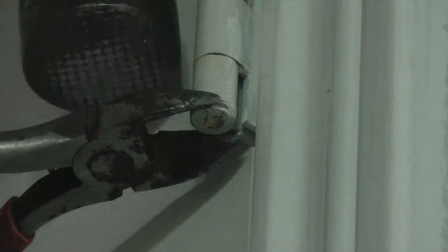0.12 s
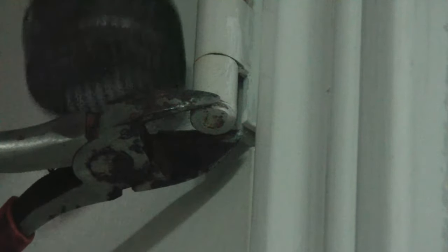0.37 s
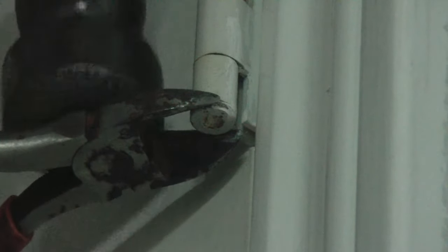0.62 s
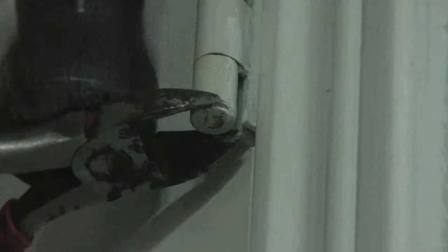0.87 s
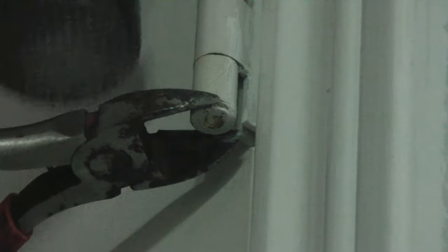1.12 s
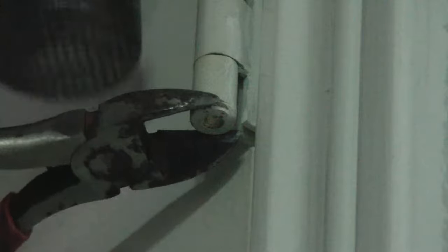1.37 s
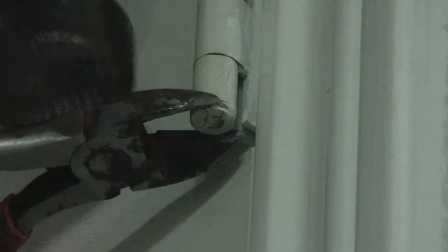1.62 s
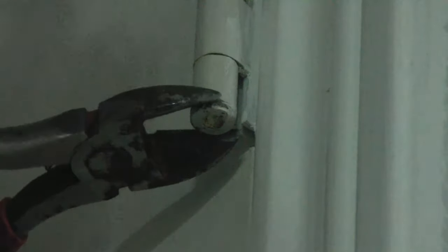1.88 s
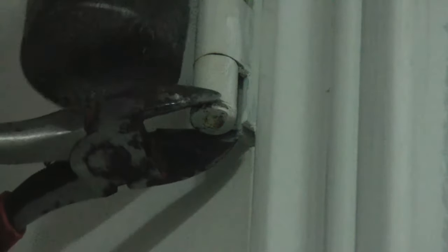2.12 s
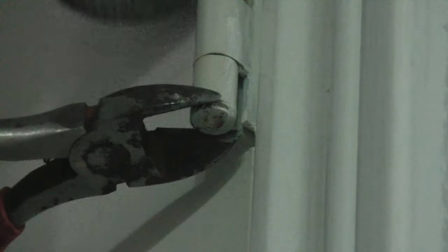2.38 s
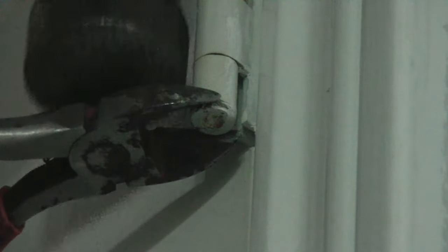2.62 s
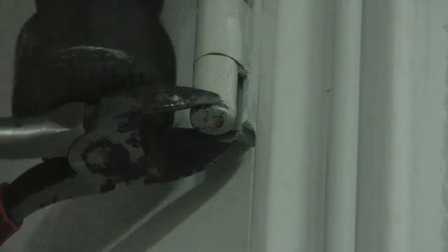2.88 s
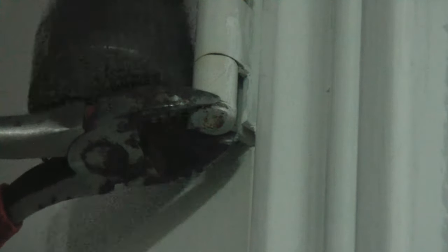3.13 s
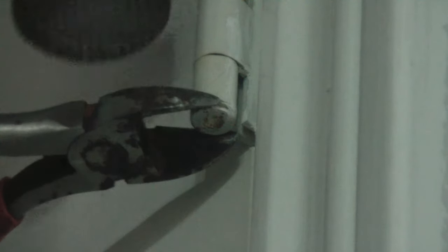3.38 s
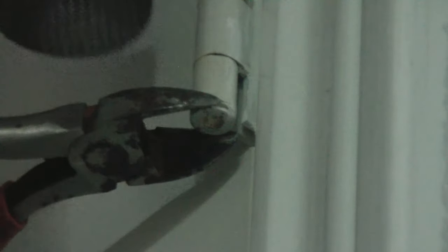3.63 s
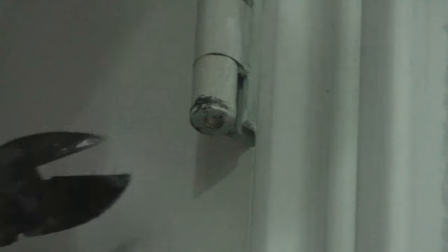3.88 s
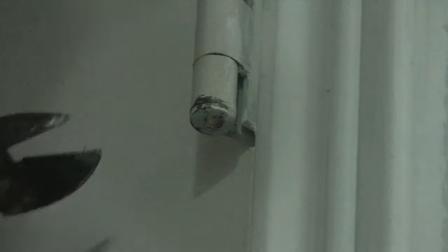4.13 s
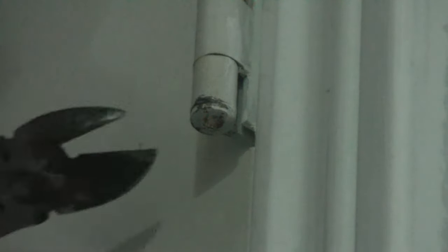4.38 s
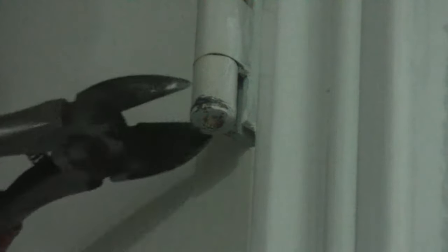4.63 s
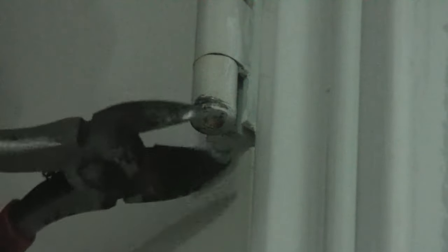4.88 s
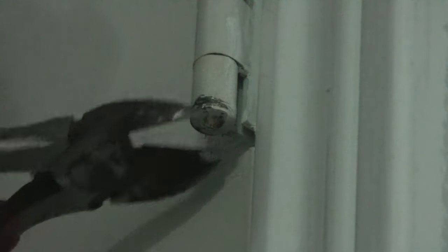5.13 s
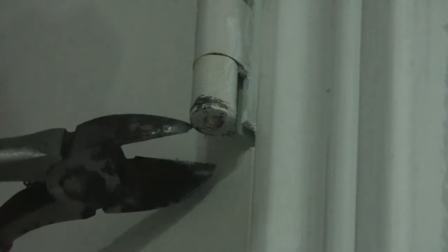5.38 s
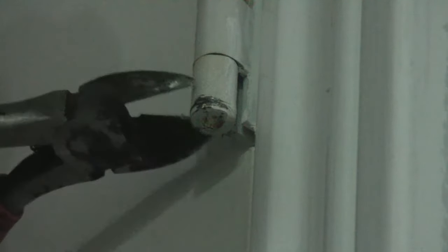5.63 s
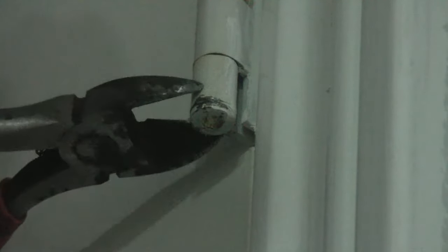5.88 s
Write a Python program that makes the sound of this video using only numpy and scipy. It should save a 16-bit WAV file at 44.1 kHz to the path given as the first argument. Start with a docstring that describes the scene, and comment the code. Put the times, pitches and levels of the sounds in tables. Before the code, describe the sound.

A hammer raps hard on steel pliers gripping a door hinge, loud and close, overloading, then the jaws scrape and nudge the metal cap.

```python
"""Hammer on pliers at a door hinge

A hammer raps steel pliers that grip the cap of a door hinge, close to a small stereo microphone that overloads.
Door, hinge, pin and steel ring as dying sines with a click of contact; a bare room answers with noise tails.
In the quiet the jaws nudge the cap: runs of tiny slips excite the door and jaws. Room tone lies beneath."""
import sys
import numpy as np
from scipy import signal
from scipy.io import wavfile

SR = 44100
rng = np.random.default_rng(int(sys.argv[2]) if len(sys.argv) > 2 else 0)


def wrap_up_sound(samples):
    """Save the sound to the file named by the first command line argument, as 16-bit audio."""
    columns = np.atleast_2d(samples).T
    # keep every value between -1 and 1, then stretch to whole-number steps
    tamed = np.clip(columns, -1, 1)
    steps = np.round(tamed * 32767).astype(np.int16)
    wavfile.write(sys.argv[1], SR, steps)


def how_loud(loudness_db):
    """Turn decibels into a plain amplitude multiplier (0 dB gives 1, 20 dB gives 10)."""
    steps = np.asarray(loudness_db, float) / 20
    return 10 ** steps


N = 264820  # length in samples


def evened(x):
    """Scales to rms 1."""
    return x / np.sqrt(np.mean(x ** 2) + 1e-20)


def read(points, hz, column=1):
    """Reads a table on a log-frequency axis."""
    table = np.transpose(points)
    return np.interp(np.log(hz + 1), np.log(table[0] + 1), table[column])


def stereo_noise(frames, alike):
    """Random short-time spectra for two microphone ports, alike by frequency."""
    a, b, c, d = rng.standard_normal((frames, len(alike), 4)).T
    same = np.clip(alike, -1, 1)[:, None]
    left = a + 1j * b
    right = same * left + np.sqrt(1 - same ** 2) * (c + 1j * d)
    return np.array([left, right])


# colour of the room tone and hiss: (frequency [Hz], relative density [dB])
AIR_COLOUR = [(12, -54), (20, -7.5), (54, -3.5), (174, -13), (242, -7), (270, -12.5), (587, -18),
              (713, -21.5), (940, -16), (1640, -24.5), (2160, -22), (3550, -27.5), (10200, -31),
              (15000, -36.5)]
# left-right likeness of the room tone: (frequency [Hz], correlation [-1 to 1])
AIR_ALIKE = [(60, 0.95), (150, 0.95), (380, 0.91), (950, 0.73), (2380, 0.074), (5980, -0.14), (15000, 0.12)]
# faint steady tones: (frequency [Hz], rms level [dB])
WHINE = [(242.2, -57.5), (963.6, -106.5), (2159, -65), (5125, -71), (7671, -74.5), (9469, -73),
         (10218, -65), (10250, -75)]
AIR_DB = -44  # rms of the hiss over both channels


def air():
    """Room tone and microphone hiss as coloured stereo noise, with a few thin steady sines."""
    hz, t = np.fft.rfftfreq(2048, 1 / SR), np.arange(N) / SR
    spectra = stereo_noise(N // 512 + 5, read(AIR_ALIKE, hz)) * how_loud(read(AIR_COLOUR, hz))[:, None]
    noise = signal.istft(spectra, nperseg=2048, noverlap=1536)[1][:, :N]
    hiss = how_loud(AIR_DB) * evened(noise)
    tones = sum(how_loud(db) * np.sqrt(2) * np.sin(2 * np.pi * (f * t + rng.random())) for f, db in WHINE)
    return hiss + tones


# decay of the room: (frequency [Hz], near t60 [s], far t60 [s])
ROOM_DECAY = [(30, 0.31, 0.79), (153, 0.12, 0.38), (520, 0.23, 0.62), (1930, 0.17, 0.52), (4630, 0.2, 0.5),
              (12200, 0.041, 0.29)]
# left-right likeness of the tail: (frequency [Hz], correlation [0 to 1])
TAIL_ALIKE = [(60, 1), (640, 0.98), (1400, 0.95), (3100, 0.89), (6800, 0.063), (15000, 0.055)]
# stereo balance of the tail: (frequency [Hz], left over right [dB])
TAIL_BALANCE = [(60, 5.5), (240, 0), (950, 0.5), (3770, 1.5), (15000, 3)]
ROOM_DB, FAR_DB = 8, -11  # left tail over the direct sound before the band limit; far start over near start
HEARD_HZ = (111.6, 11300)  # the door radiates little bass; the microphone port dulls the top


def room():
    """Direct sound, a quick noise tail from the near walls and a slower one from the rest of the house."""
    hz, t = np.fft.rfftfreq(256, 1 / SR), np.arange(SR // 88) * 64 / SR
    near_t60 = read(ROOM_DECAY, hz)[:, None]
    far_t60 = read(ROOM_DECAY, hz, column=2)[:, None]
    decay = np.hypot(how_loud(-60 * t / near_t60), how_loud(FAR_DB - 60 * t / far_t60))
    spectra = stereo_noise(len(t), read(TAIL_ALIKE, hz)) * decay
    spectra *= how_loud(np.array([.5, -.5])[:, None, None] * read(TAIL_BALANCE, hz)[:, None])
    tail = signal.istft(spectra, nperseg=256, noverlap=192)[1]
    tail *= np.minimum(np.arange(tail.shape[1]) / (0.001 * SR), 1)  # the walls swell in over 1 ms
    tail *= how_loud(ROOM_DB) / np.linalg.norm(tail[0])
    tail[:, 0] = 1  # direct sound
    return signal.sosfilt(signal.butter(3, HEARD_HZ, "bandpass", fs=SR, output="sos"), tail)


def burst(band_hz, t60):
    """Noise in one band that dies quickly."""
    t = np.arange(SR // 4) / SR
    band = signal.butter(2, band_hz, "bandpass", fs=SR, output="sos")
    return evened(signal.sosfilt(band, rng.standard_normal(len(t)))) * how_loud(-60 * t / t60)


UNEVEN_DB = 1.5  # spread of each mode; no two blows land on the same spot


def ring(modes, spot, knock_db=17):
    """Dying sines of one body plus the click of contact, radiated only in the band of that body."""
    hz, db, t60 = np.transpose(modes)[:, :, None]
    t = np.arange(SR // 4) / SR
    envelopes = how_loud(db + UNEVEN_DB * spot[:len(modes), None] - 60 * t / t60)
    sines = envelopes * np.sin(2 * np.pi * hz * t)
    band = signal.butter(4, (0.92 * hz.min(), 1.108 * hz.max()), "bandpass", fs=SR, output="sos")
    click = signal.sosfilt(band, signal.unit_impulse(len(t)))
    tone = signal.sosfilt(band, sines.sum(0)) / np.linalg.norm(how_loud(db))
    return tone + how_loud(knock_db) * click / np.linalg.norm(click)


# the jaws touch and scrape the cap; the last three levels ride on the force:
# (time [s], force [dB], door knock [dB], jaw clack [dB], jaw ring [dB])
NUDGES = [(1.95, -44, -29, -5, 1), (2.035, -40, -23, -3, -14), (3.642, -55.5, 14.5, 18.5, -34),
          (3.765, -23, -9.5, -5.5, -27), (3.921, -35.5, 2.5, 2, -14), (3.952, -43.5, -11, 7, 5),
          (4.138, -44, -14, -2, -16), (4.731, -23, -8, -7, -14), (4.802, -34, -6, -0.5, -10),
          (5.007, -36, -26, -2, -27), (5.021, -2, -22.5, -8.5, -7), (5.212, -20, -1, 5.5, -44),
          (5.299, -23.5, -0.5, 0, -13.5), (5.364, -25.5, -12.5, -8, -20), (5.465, -38, -28, -15, -11),
          (5.542, -28, -17, -9, -11.5), (5.766, -29, -3, 2, -35), (5.814, -19.5, -8, -15.5, -41)]
# door modes, also rung by the hammer: (frequency [Hz], relative level [dB], t60 before damping [s])
DOOR = [(130.7, -30, 0.099), (155.2, -9, 0.62), (176.5, 1.5, 0.17), (220.3, -2.5, 0.24), (295, -3, 0.036),
        (358.4, -20.5, 0.69), (430.5, -2.5, 0.13), (465.4, 2, 0.025), (649, 15, 0.01), (698, -6.5, 0.37),
        (804, 6.5, 0.017), (1043, 6.5, 0.0081)]
# lower jaw modes: (frequency [Hz], relative level [dB], t60 before damping [s])
JAW_CLACK = [(684, -10, .12), (969, -10, .05), (1050, -13, .04), (1394, -10, .008), (1642, -6, .01),
             (1850, -6, .01), (2137, -8, .01), (2471, -13, .008)]
# upper jaw modes: (frequency [Hz], relative level [dB], t60 before damping [s])
JAW_RING = [(2860, -12, .01), (3620, -3, .01), (4210, -12, .006), (4657, -11, .006), (5227, -12, .006),
            (6500, -12, .004), (8000, -14, .004)]
# click of contact against the modes, one [dB] each: (low door, high door, jaw clack, jaw ring)
JAW_KNOCK_DB = (26, 17, 8.9, 13.2)
BOOM_DB, BOOM_PER_DB = -13, 0.06  # low door modes on the knock: dB, and dB per dB of force
DAMPING = 0.14  # dB of ring time lost per dB of force: lightly pressed jaws hardly ring
DRAG_S, HARD_HZ = 0.00025, 12900  # scrape decay and top of the spectrum for a touch of 0 dB
SLIPS_PER_S = 4600
TICK_DB, TICK_HZ, TICK_T60 = -12, (6540, 12950), .02  # dB on the jaw ring, band, s


def nudges():
    """Each touch is a short run of tiny slips; a gentle touch is duller and drags longer."""
    out, spots = np.zeros(N + SR), rng.standard_normal((len(NUDGES), 16))
    t = np.arange(SR // 8) / SR
    bodies = DOOR[:5], DOOR[5:], JAW_CLACK, JAW_RING
    for (s, force_db, knock_db, clack_db, ring_db), spot in zip(NUDGES, spots):
        boom_db = knock_db + BOOM_DB + BOOM_PER_DB * force_db
        shares_db = boom_db, knock_db, clack_db, ring_db
        damping = [1, 1, how_loud(DAMPING * force_db)]  # shortens t60 only
        sound = sum(how_loud(db) * ring(np.multiply(body, damping), spot, click_db)
                    for db, body, click_db in zip(shares_db, bodies, JAW_KNOCK_DB))
        sound = sound + how_loud(TICK_DB + ring_db) * burst(TICK_HZ, TICK_T60)
        slips = rng.standard_normal(len(t)) * (rng.random(len(t)) < SLIPS_PER_S / SR)
        slips = slips * np.exp(-t / (DRAG_S * how_loud(-.6 * force_db)))
        slips[0] = 4.5  # the first touch
        scraped = signal.fftconvolve(sound, slips / np.linalg.norm(slips))
        top_hz = min(HARD_HZ * how_loud(0.099 * force_db), .4 * SR)
        scraped = signal.lfilter(*signal.butter(2, top_hz, fs=SR), scraped)
        out[round(s * SR):][:len(scraped)] += how_loud(force_db) * scraped
    return out[:N]


# hammer blows: (time [s], door boom [dB], hinge clack [dB], steel ring [dB], pin ping [dB])
BLOWS = [(0.0039, -1.5, -3.5, -7, -22), (0.3475, -2.5, -3.5, -5.5, -11.5), (0.6709, -1, -1.5, -3.5, -12),
         (0.9827, -1.5, -2.5, -3, -10), (1.3064, -1, -2, 1, -16), (1.616, -0.5, -1, 2.5, -9),
         (2.1234, -2, -6.5, -17, -25.5), (2.3449, -7, -14.5, -20, -34), (2.3887, -18, -14.5, -19.5, -53),
         (2.6417, 6, -9.5, -20.5, -32.5), (2.6785, -9, -1.5, -4, -30), (2.7569, -14, -14, -16.5, -36),
         (2.9729, 1, -0.5, -0.5, -16), (3.1262, -10.5, -44.5, -36, -50), (3.2305, 0, 4, 1, -25)]
# hinge modes: (frequency [Hz], relative level [dB], t60 [s])
HINGE = [(1603, -13.5, 0.01), (1662, 6, 0.017), (1725, -6.5, 0.039), (1795, -4, 0.038), (1986, 3.5, 0.027),
         (2185, 4, 0.016), (2293, 16, 0.0022), (2850, 6.5, 0.008), (3040, 5, 0.015)]
# hinge pin modes: (frequency [Hz], relative level [dB], t60 [s])
PIN = [(3013, -13, 0.017), (2974, -15.5, 0.024), (4525, -13, 0.011), (4690, -4.5, 0.023)]
# steel modes: (frequency [Hz], relative level [dB], t60 [s])
STEEL = [(3910, -14.5, 0.076), (4480, 0.5, 0.0084), (4900, 3, 0.0057), (5950, 0, 0.0068),
         (6800, -0.5, 0.013), (8790, -5, 0.058)]
CRACK_T60, CRACK_HZ = 0.01, (4700, 12500)  # s; the band of the bare steel-on-steel tick
# the crack follows the steel ring gently on square blows and vanishes fast on glancing ones:
# dB at the bend, steel ring dB of the bend, slopes in dB per dB
CRACK_DB, SQUARE_DB, CRACK_SQUARE, CRACK_GLANCING = -7, -9, 1, 4.7
SWAY_HZ, SWAY_DB, SWAY_T60 = 28.5, -21.5, .8  # the whole door leaf; dB on the boom, s
LOOSE_S, DROP_S, DROP_DB = 1.2, .1215, -24  # until then the jolted pin drops back this long after each blow
PING_NEAR_DB = 18  # the small pin faces the microphone: direct ping over what feeds the room
STANCES = 3  # arm and hammer shade the walls differently from blow to blow


def strikes():
    """Every hammer blow sets hinge, door, pin and steel ringing and cracks; the door leaf also sways."""
    by_stance, direct = np.zeros((STANCES, N + SR)), np.zeros(N + SR)
    spots = rng.standard_normal((len(BLOWS), 16))
    t = np.arange(SR) / SR
    sway = how_loud(SWAY_DB - 60 * t / SWAY_T60) * np.sin(2 * np.pi * SWAY_HZ * t)
    for k, ((s, door_db, hinge_db, steel_db, pin_db), spot) in enumerate(zip(BLOWS, spots)):
        out, start = by_stance[k % STANCES], round(s * SR)
        slope = CRACK_SQUARE if steel_db > SQUARE_DB else CRACK_GLANCING
        crack = how_loud(CRACK_DB + (steel_db - SQUARE_DB) * slope) * burst(CRACK_HZ, CRACK_T60)
        ping = how_loud(pin_db) * ring(PIN, spot, knock_db=-27.5)
        clack = how_loud(hinge_db) * ring(HINGE, spot) + ping
        boom = how_loud(door_db) * ring(DOOR, spot)
        steel = how_loud(steel_db) * ring(STEEL, spot)
        out[start:][:len(clack)] += clack + boom + steel + crack
        if s < LOOSE_S:
            out[round((s + DROP_S) * SR):][:len(clack)] += how_loud(DROP_DB) * clack
        direct[start:][:len(ping)] += how_loud(PING_NEAR_DB) * ping
        direct[start:][:SR] += how_loud(door_db) * sway
    return by_stance[:, :N], direct[:N]


STOP_S, RESUME_S = 1.874, 2.12  # the ringing of the first run of blows stops dead; the next run starts


def scene():
    """Contacts through the room, the ping and the sway also straight on, over the room tone."""
    t = np.arange(N) / SR
    contacts, direct = strikes()
    split = round(STOP_S * SR)
    silenced = np.clip((STOP_S - t) / 0.0019, 0, 1)  # fades over the last 1.9 ms
    contacts[0, split:] += nudges()[split:]
    out = direct * np.maximum(silenced, t > RESUME_S) + air()
    for part in contacts:
        walls = room()  # one set of walls per stance
        first_run = signal.fftconvolve(part[None, :split], walls, axes=1)[:, :split]
        out[:, :split] += first_run * silenced[:split]
        out[:, split:] += signal.oaconvolve(part[None, split:], walls, axes=1)[:, :N - split]
    return out


def low_pass(x):
    """Removes everything above the highest recorded frequency."""
    return signal.sosfilt(signal.butter(12, 15710, fs=SR, output="sos"), x)


KNEE = 7  # higher bends later and more sharply


def record(dry):
    """The overloaded input stage flattens the loud blows at full scale."""
    flat = dry / (1 + abs(dry) ** KNEE) ** (1 / KNEE)
    return low_pass(flat)


dry = scene()
out = record(dry)
wrap_up_sound(out)
```